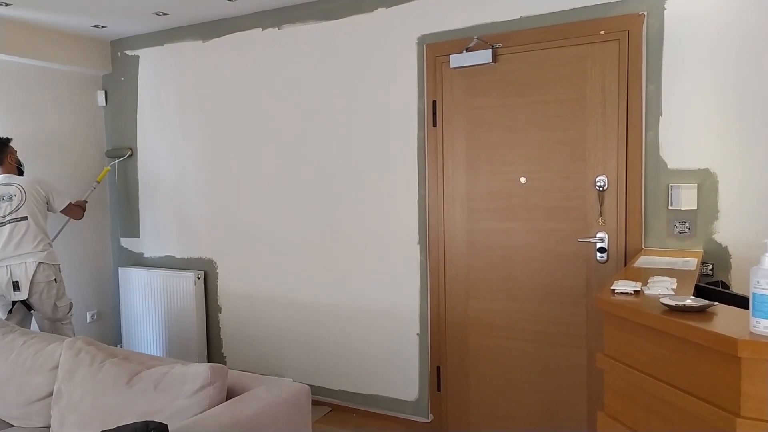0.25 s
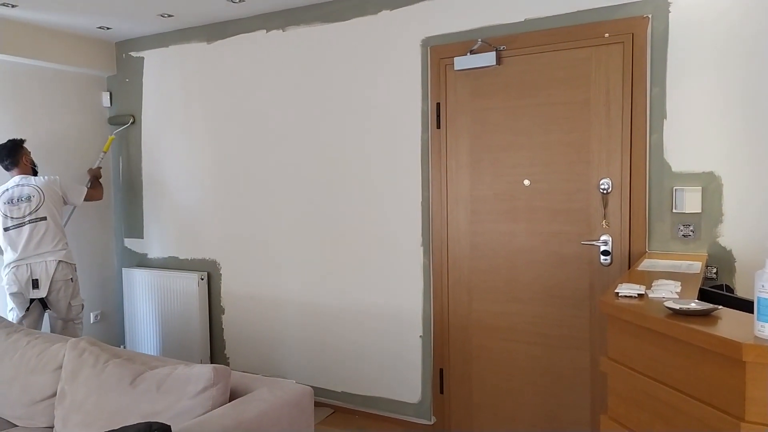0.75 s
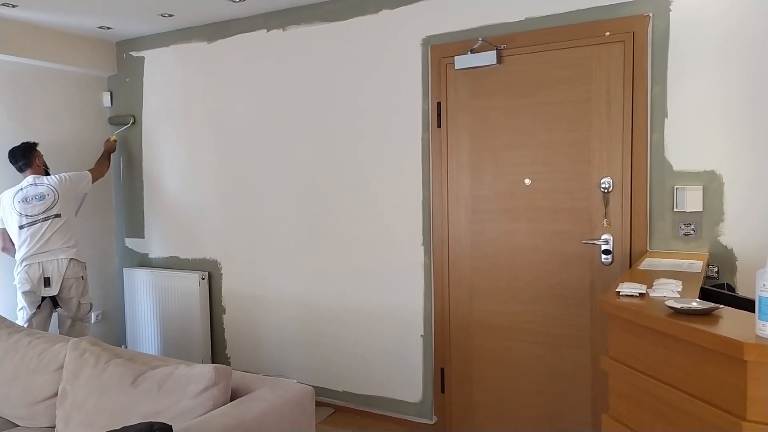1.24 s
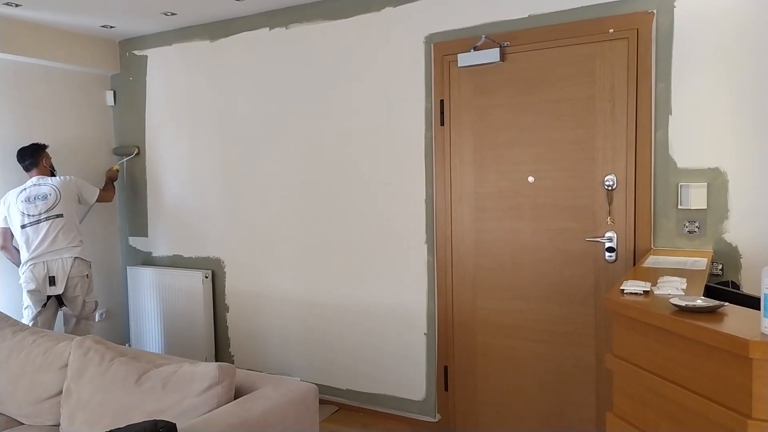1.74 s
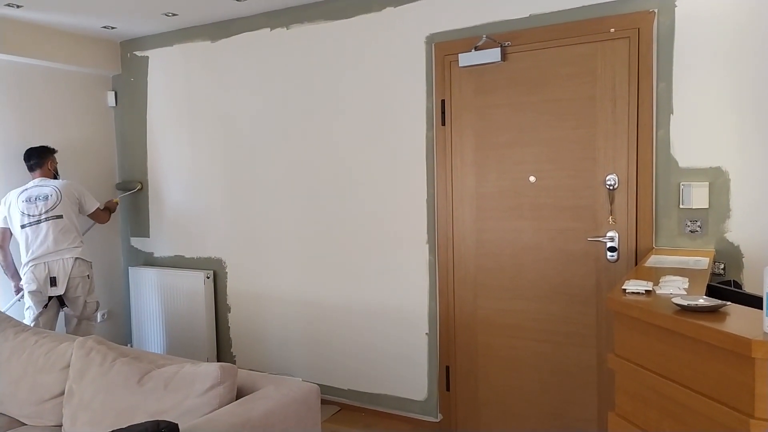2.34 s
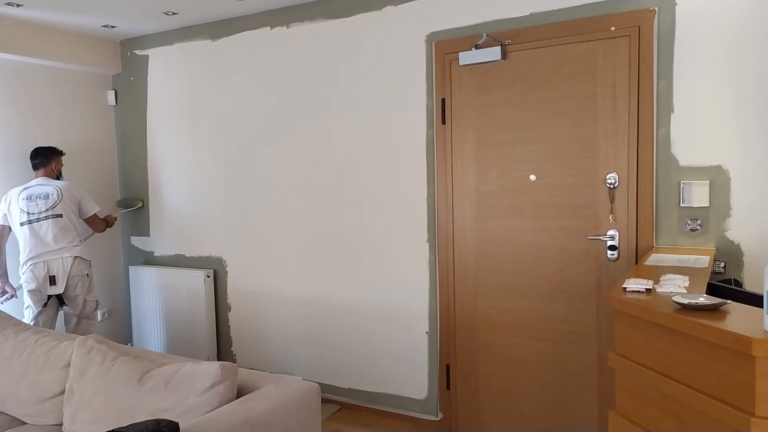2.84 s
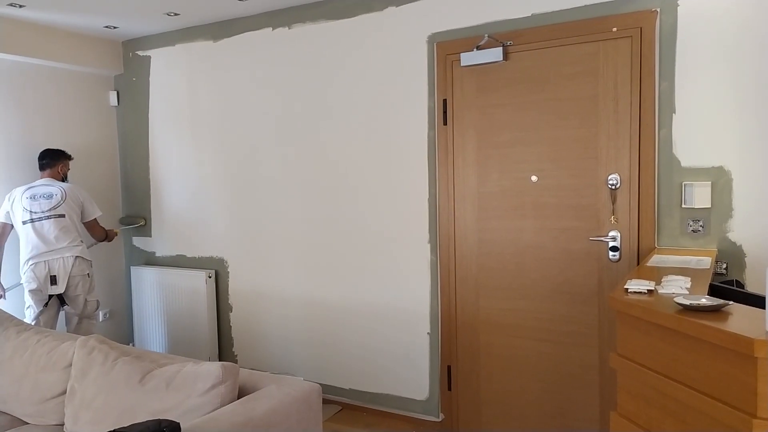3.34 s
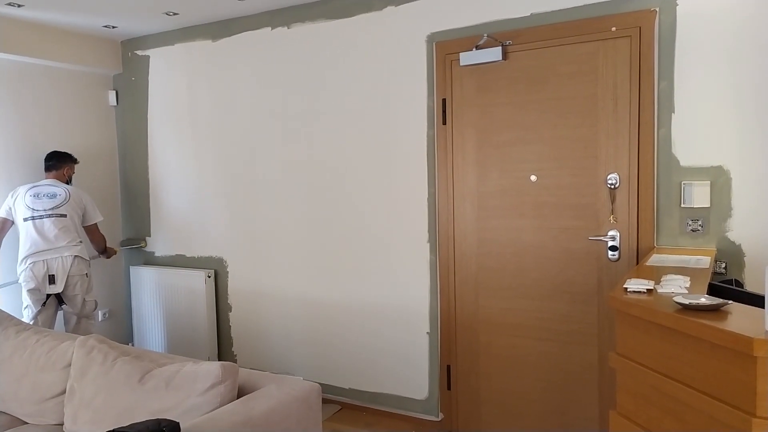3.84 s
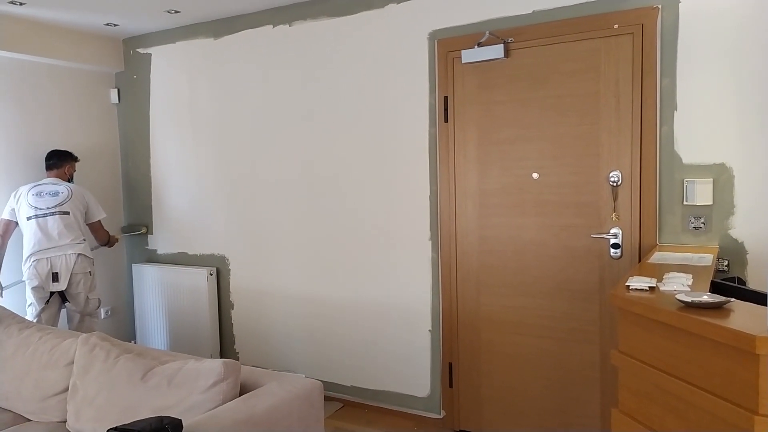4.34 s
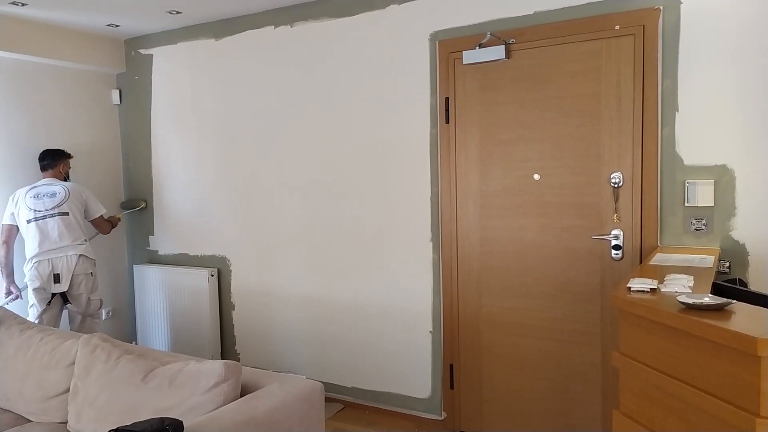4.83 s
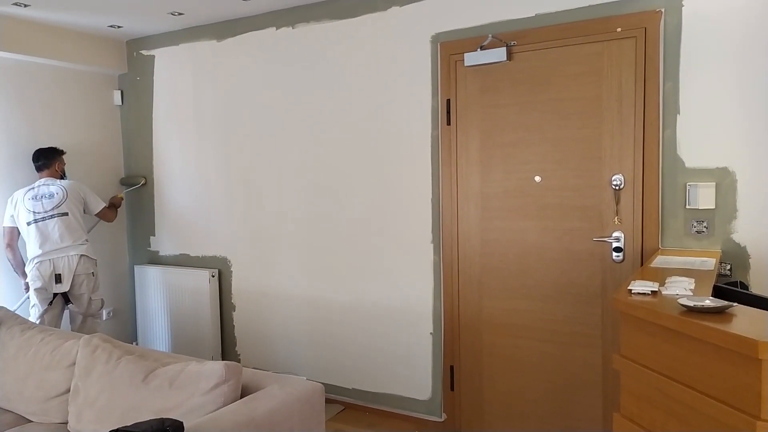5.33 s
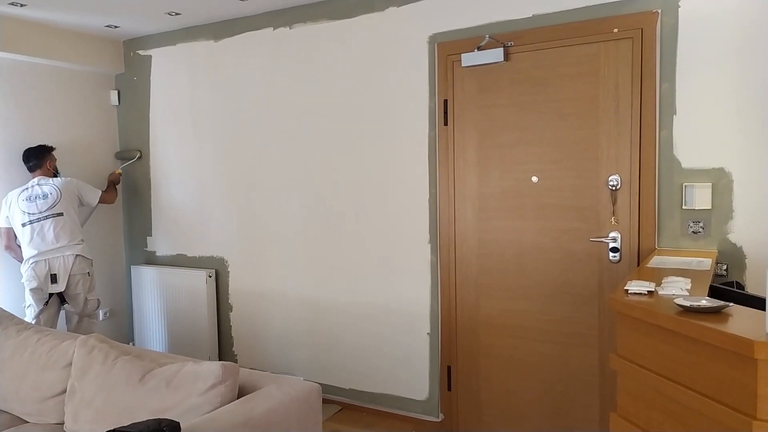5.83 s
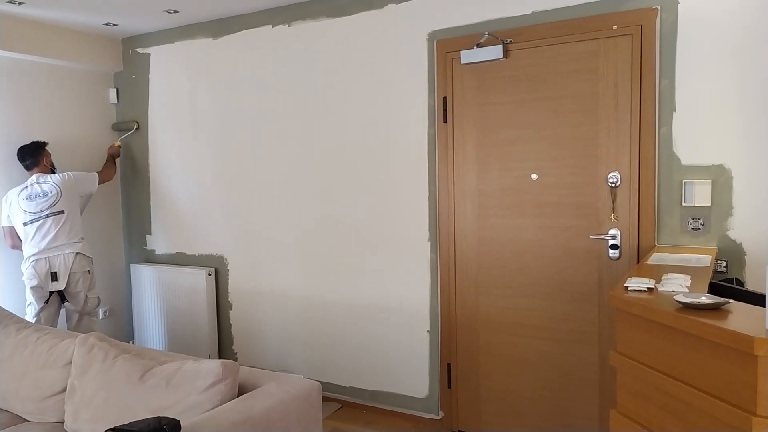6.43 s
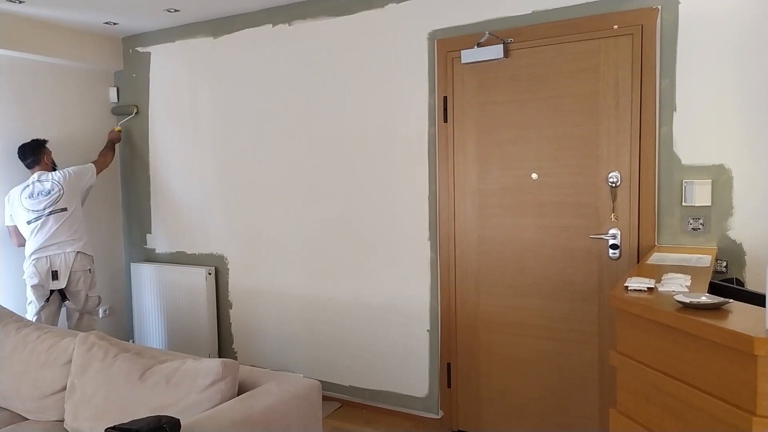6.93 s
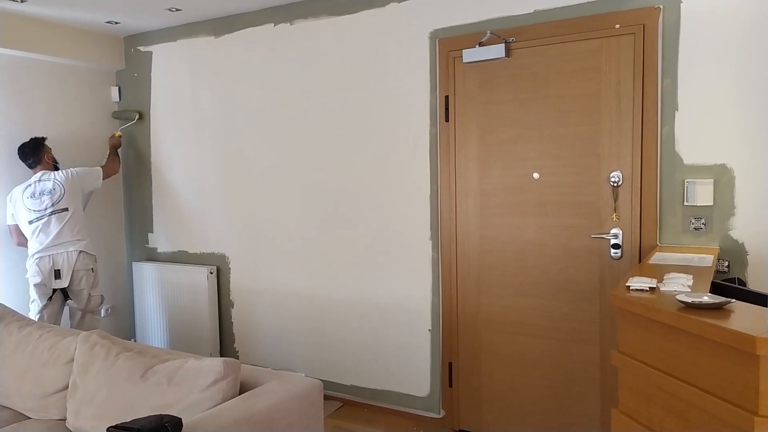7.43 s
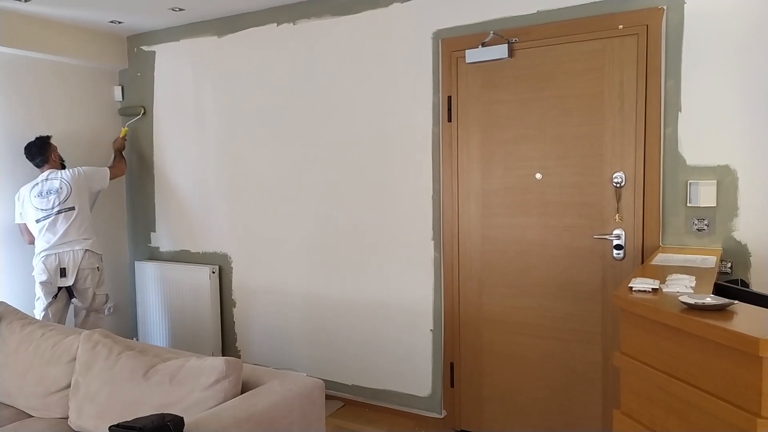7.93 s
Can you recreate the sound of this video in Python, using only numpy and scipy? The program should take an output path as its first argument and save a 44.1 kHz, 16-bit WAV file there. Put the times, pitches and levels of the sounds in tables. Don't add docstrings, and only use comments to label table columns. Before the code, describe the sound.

A wet paint roller rasps and hisses in strokes along a smooth indoor wall, over low room rumble and motor hum, with small late knocks.

```python
import sys
import numpy as np
from scipy import signal
from scipy.fft import rfft, irfft
from scipy.io import wavfile
from scipy.ndimage import uniform_filter1d, minimum_filter1d

SR = 44100
rng = np.random.default_rng(int(sys.argv[2]) if len(sys.argv) > 2 else 0)


def amp(db):
    return 10 ** (np.asarray(db, float) / 20)


def write(x):
    x = np.atleast_2d(x).T
    wavfile.write(sys.argv[1], SR, np.round(np.clip(x, -1, 1) * 32767).astype(np.int16))


N = 360297
PORT_LAG_SAMPLES = 12


def rms_one(x):
    return x / np.sqrt(np.mean(x ** 2) + 1e-20)


def in_time(rows):
    s, *columns = np.transpose(rows)
    return [np.interp(np.arange(N) / SR, s, column) for column in columns]


def at_hz(points, hz):
    point_hz, value = np.transpose(points)
    return np.interp(np.log(hz), np.log(point_hz), value)


def drift(rate_hz, step=40):
    r = np.exp(-2 * np.pi * rate_hz * step / SR)
    noise = rng.standard_normal(N // step + 2002)
    slow = signal.lfilter([1], [1, -2 * r, r * r], noise)[2000:]
    return np.interp(np.arange(N) / step, np.arange(len(slow)), rms_one(slow))


def bin_hz():
    return np.maximum(np.arange(N // 2 + 1) * SR / N, 10)


# frequency in Hz, left over right in dB.
LEFT_OVER_RIGHT = [(60, 1.1), (150, 1.9), (300, .7), (700, .4), (1500, -.3), (2400, 1.5), (4400, 6),
                   (5800, 7), (8100, 3), (10000, 3.5), (11500, 7), (13500, 8), (15500, 8)]


def leaning(pair):
    lean = amp(at_hz(LEFT_OVER_RIGHT, bin_hz()) / 2)
    return irfft(rfft(pair) * [lean, 1 / lean], N)


# frequency in Hz, share of power common to both (0-1).
LIKENESS = [(60, 1), (200, .97), (500, 0.92), (1000, 0.77), (1800, 0.35), (2700, 0.28), (4500, 0.13),
            (9000, 0.092), (15000, 0.021)]


def ports(sources, gain_of_hz):
    hz = bin_hz()
    common, left, right = rfft(sources)
    alike = np.clip(at_hz(LIKENESS, hz), 0, 1)
    lag = np.exp(-2j * np.pi * hz * PORT_LAG_SAMPLES / SR)
    shared = np.sqrt(alike) * common * [lag, np.ones_like(lag)]
    private = np.sqrt(1 - alike) * np.array([left, right])
    pair = leaning(irfft((shared + private) * gain_of_hz(hz), N))
    return pair / np.sqrt(np.mean(pair.mean(axis=0) ** 2))


# stop in seconds, rest in seconds, braking in seconds, creep left in dB.
HALTS = [
    (.335, .005, 0.13, -15),
    (.92, 0.0046, 0.14, -7.5),
    (1.085, 0.027, 0.11, -19),
    (1.26, .005, 0.085, -9.5),
    (4.135, .01, 0.16, -20),
    (6.99, 0.023, 0.14, -26),
    (7.47, 0.088, 0.17, -31),
    (7.64, 0.093, 0.089, -8),
    (7.9, 0.021, 0.12, -21),
]


def speed_db():
    t, out = np.arange(N) / SR, 0
    for stop_s, rest_s, braking_s, creep_db in HALTS:
        before = (stop_s - t) / braking_s
        after = (t - stop_s - rest_s) / (braking_s * 0.96)
        away = np.maximum(before, after).clip(0)
        creep = amp(creep_db)
        out = out + 20 * np.log10(creep + (1 - creep) * np.tanh(away))
    return out


# frequency in Hz, density in dB per Hz.
NAP = [(710, 7), (1200, -17), (1950, -8), (3710, -3.5), (5070, -2.5), (5900, 1.5), (6570, 0.5), (8590, 2),
       (11600, -3.5), (13700, -5), (15000, -3), (15700, -22.5)]
# time in seconds, pace as hiss in dB, nap pressure (0-1), track wetness (0-1).
ARM = [(0, -56.5, 0.03, 0.64), (.25, -55.5, 0.36, 0.54), (.55, -55.5, 0.76, 0.9), (.77, -54.5, 0.36, 0.4),
       (1.2, -61.5, 0.87, 0.35), (1.45, -58, 0.4, 0.9), (1.85, -55.5, 0.37, .8), (2.15, -59.5, 0.52, .7),
       (2.42, -59, 0.07, 0.64), (2.92, -63, 0.28, 0.55), (3.95, -57, 0.2, .4), (4.45, -54.5, 0.3, 0.47),
       (4.8, -58, 0.48, 0.37), (5.5, -59, .7, 0.65), (6.0, -56.5, .65, 0.53), (6.3, -60, 0.65, 0.52),
       (7.2, -59, 0.62, 0.62), (8.17, -61.5, .6, 0.55)]


def roller(snaps_per_s=9000, size_spread_db=1.5, patchy_db=0.87):
    pace_db, pressure, wetness = in_time(ARM)
    slowed_db = speed_db()
    hiss_db = pace_db + slowed_db
    rasp_db = -11 + 10 * pressure + (0.74 - 1) * slowed_db
    spray_db = -7 + 7.5 * wetness + (1.06 - 1) * slowed_db

    sizes_db = size_spread_db * np.minimum(rng.exponential(1, (3, N)), 5)
    sizes = amp(sizes_db) * rng.choice([-1, 1], (3, N))
    snaps = sizes * (rng.random((3, N)) < snaps_per_s / SR)
    threads = ports(snaps, lambda hz: amp(at_hz(NAP, np.minimum(hz, 14800))) * (hz > 700))

    out, together = 0, drift(13.4)
    bands = [(894, 4600, rasp_db + 0.15), (4370, 9400, -0.15), (9330, 15400, spray_db - .2)]
    for low_hz, high_hz, lift_db in bands:
        sos = signal.butter(3, [low_hz, high_hz], "band", fs=SR, output="sos")
        band = signal.sosfiltfilt(sos, threads)
        band = band / np.std(band.mean(axis=0))
        flutter_db = patchy_db * together + .5 * drift(16)
        out = out + band * amp(hiss_db + lift_db + flutter_db)
    return out


def hum(hum_hz=148.6, level_db=-55):
    phase = 2 * np.pi * hum_hz * np.arange(N) / SR + 0.54 * drift(0.76)
    tone = np.sqrt(2) * amp(level_db + 0.96 * drift(1.34)) * np.sin(phase)
    return tone * amp([[.9], [-.9]])


# peak in seconds, level in dB.
BOOMS = [
    (.2, -51),
    (.98, -50),
    (1.58, -51),
    (3.3, -56.5),
    (4.35, -64),
    (4.78, -53),
    (5.72, -53.5),
    (6.05, -53),
    (7.0, -63),
    (7.95, -52.5),
]


def booming(swell_s=0.17, rest_db=-58.5):
    t = np.arange(N) / SR
    return amp(rest_db) + sum(amp(db) * np.exp(-((t - s) / swell_s) ** 2) for s, db in BOOMS)


# frequency in Hz, density in dB per Hz.
RUMBLE = [(24, -44), (40, -5), (71, 1), (103, -5.5), (150, -4), (170, -15), (193, -7), (487, -14.5),
          (1740, -22.5), (4280, -31), (5640, -33.5), (8000, -37), (8840, -32), (14600, -45), (15700, -51)]
# frequency in Hz, width in Hz, level in dB.
ROOM_MODES = [(99.2, 4.8, -62), (118, 6.6, -68.5), (168.7, 15.5, -67), (202.4, 2.6, -74),
              (218.6, 10.8, -66.5), (331.2, 13, -75), (370.8, 9, -79.5), (435, 11.6, -78.5)]


def rumble(level_db=-56):
    def noise(gain_of_hz):
        return ports(rng.standard_normal((3, N)), gain_of_hz)

    def peak(centre_hz, width_hz):
        return noise(lambda hz: (hz > 34) / (1 + ((hz - centre_hz) / width_hz * 2) ** 2))

    def floor(hz):
        return amp(at_hz(RUMBLE, np.minimum(hz, 14400))) / (1 + (36 / hz) ** 14)

    modes = sum(amp(db) * peak(hz, width_hz) for hz, width_hz, db in ROOM_MODES)
    lowest = amp(-5.5) * booming() * peak(63.8, 10.7)
    return amp(level_db) * noise(floor) + modes + lowest


# frequency in Hz, density in dB per Hz.
HARD_KNOCK = [(240, -40), (400, -15), (854, -7), (1210, -4), (1310, -9), (1430, 0), (3150, -1.5),
              (4880, -6.5), (5770, -1), (6610, -15.5), (10300, -12.5), (15000, -33)]
# frequency in Hz, density in dB per Hz.
DULL_KNOCK = [(240, -36), (400, -1), (756, 2.5), (1390, -4), (1850, -8), (2390, 4), (2790, -14.5),
              (5680, -9), (8060, -31), (8690, -30), (9520, -35), (15000, -44)]
# time in seconds, peak in dB, hardness (0-1), rattle in seconds.
KNOCKS = [(.497, -44, 0.7, 0.0018), (.543, -43.5, 0.9, 0.0051), (7.5699, -31.5, 1, 0.0048),
          (7.591, -52, 1, 0.005), (7.608, -45.5, 1, 0.0089), (7.779, -55, 0.8, 0.0084),
          (7.8075, -39.5, 0.3, .002), (7.8115, -42, 0.2, 0.0025), (7.816, -40, 0.15, 0.0029),
          (7.830, -50, .01, 0.0026), (7.848, -46, 0.5, 0.0032), (1.2, -53.5, .5, .008)]


def knocks():
    size = 2048
    out, t = np.zeros(N), np.arange(size) / SR - .005
    hz = np.clip(np.arange(size // 2 + 1) * SR / size, 10, 15000)
    for s, peak_db, hardness, rattle_s in KNOCKS:
        contacts = rng.standard_normal(size) * np.exp(-(t / rattle_s) ** 2) * (t > 0)
        colour_db = hardness * at_hz(HARD_KNOCK, hz) + (1 - hardness) * at_hz(DULL_KNOCK, hz)
        lines = rfft(contacts)
        even = lines / np.sqrt(uniform_filter1d(np.abs(lines) ** 2, size=13))
        rung = irfft(even * amp(colour_db) / (1 + (330 / hz) ** 4))
        at = round((s + t[0]) * SR)
        out[at:at + size] += amp(peak_db + 7) * rung / np.max(np.abs(rung))
    return out


# frequency in Hz, 60 dB decay in seconds.
ROOM_T60 = [(500, 0.4), (2000, 0.31), (6000, 0.28), (12000, 0.16)]


def room(x):
    t = np.arange(int(.6 * SR)) / SR
    tail, white = 0, rng.standard_normal((2, len(t)))
    for low_hz in 250 * 2. ** np.arange(6):
        sos = signal.butter(2, [low_hz, 2 * low_hz], "band", fs=SR, output="sos")
        decay_db = -60 * t / at_hz(ROOM_T60, 1.43 * low_hz)
        tail = tail + signal.sosfilt(sos, white) * amp(decay_db)
    tail = tail * np.clip((t - .002) / 0.0032, 0, 1)
    lumps = rfft(tail)
    power = np.abs(lumps) ** 2
    smooth = uniform_filter1d(power, size=900, axis=1) / uniform_filter1d(power, size=60, axis=1)
    tail = irfft(lumps * np.sqrt(smooth), len(t))
    tail = tail / np.sqrt(np.sum(tail ** 2) / 2)
    return signal.fftconvolve(x[None], tail, axes=1)[:, :N]


def frame_in_room():
    frame = knocks()
    direct = np.array([np.roll(frame, PORT_LAG_SAMPLES) * amp(1.5), frame * amp(-1.5)])
    return leaning(direct + amp(-2.0) * room(frame))


# time in seconds, peak in dB.
TICK = [
    (3.404, -22),
]


def tick():
    out, t = np.zeros((2, N)), np.arange(-20, 20) / SR
    for s, peak_db in TICK:
        push = np.exp(-np.abs(t / 5e-5) ** 1.3)
        pull = .9 * np.exp(-np.abs((t - 1.1e-4) / 3e-5) ** 1.3)
        at = round(s * SR)
        out[0, at - 20:at + 20] = amp(peak_db) * (push - pull)
    return out


def scene():
    return roller() + hum() + rumble() + frame_in_room() + tick()


# frequency in Hz, threshold in dB re local level.
GATE = [(700, -20), (1200, -8), (1700, -2.5), (2400, -.5), (3200, .5), (4400, .5), (5200, -.5),
        (6300, -3.5), (7600, -3.5), (9000, -.5), (10300, .5), (12000, 1), (14500, 1), (15500, 2.5)]


def gate(x, hop=1024, start=187):
    n, k = np.arange(2 * hop), np.arange(hop)
    window = np.sin(np.pi * (n[:, None] + .5) / (2 * hop))
    basis = np.cos(np.pi / hop * np.outer(n + .5 + hop / 2, k + .5)) * window
    basis = basis.astype(np.float32)
    padded = np.pad(x.astype(np.float32), [(0, 0), (2 * hop - start, 2 * hop)])
    blocks = padded[:, :padded.shape[1] // hop * hop].reshape(2, -1, hop)
    lines = np.concatenate([blocks[:, :-1], blocks[:, 1:]], axis=2) @ basis

    local = np.sqrt(uniform_filter1d(np.mean(lines ** 2, axis=0), size=48, axis=1))
    local = np.minimum(local, amp(3.5) * minimum_filter1d(local, size=5, axis=0))
    gate_db = at_hz(GATE, (k + .5) * SR / (2 * hop))
    restless = np.clip((gate_db + 5) / 5.5, .2, 1)
    patches_db = 6 * rng.exponential(1, (len(local) // 2 + 1, hop // 8)) - 6
    wobble_db = np.kron(patches_db, np.ones((2, 8)))[:len(local)] * restless
    local = local * (np.median(local, axis=0) / local) ** .12

    kept = lines * (np.abs(lines) > local * amp(gate_db + wobble_db))
    frames = kept @ basis.T * (2 / hop)
    joined = frames[:, 1:, :hop] + frames[:, :-1, hop:]
    return joined.reshape(2, -1)[:, hop - start:][:, :N]


def roll_off(x):
    return signal.sosfilt(signal.butter(12, 15770, fs=SR, output="sos"), x)


def record(dry):
    mix = gate(dry)
    return roll_off(mix)


dry = scene()
out = record(dry)
write(out)
```